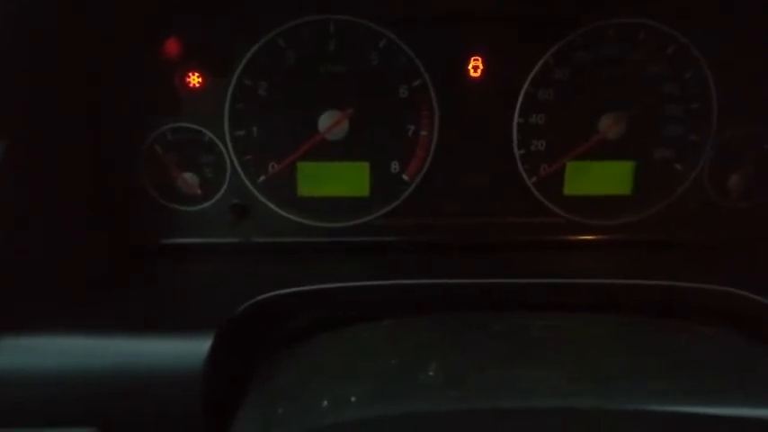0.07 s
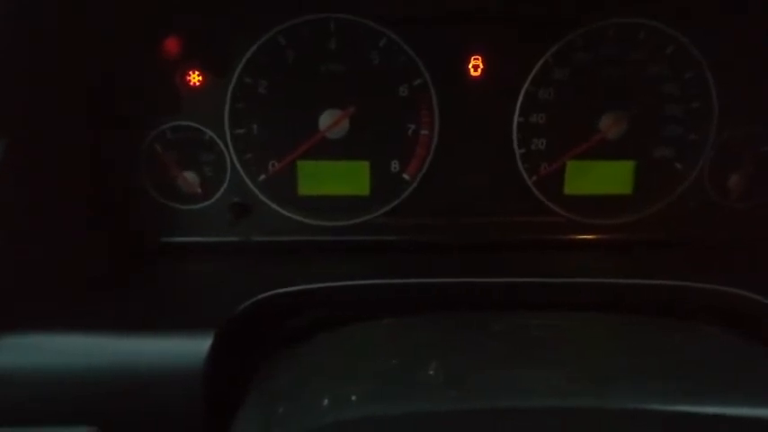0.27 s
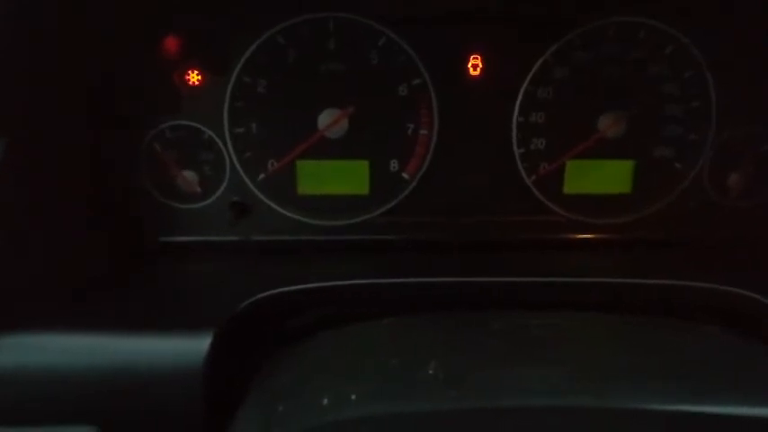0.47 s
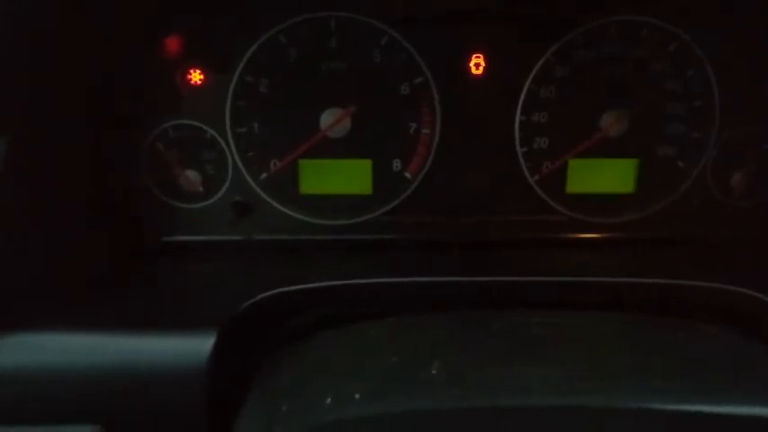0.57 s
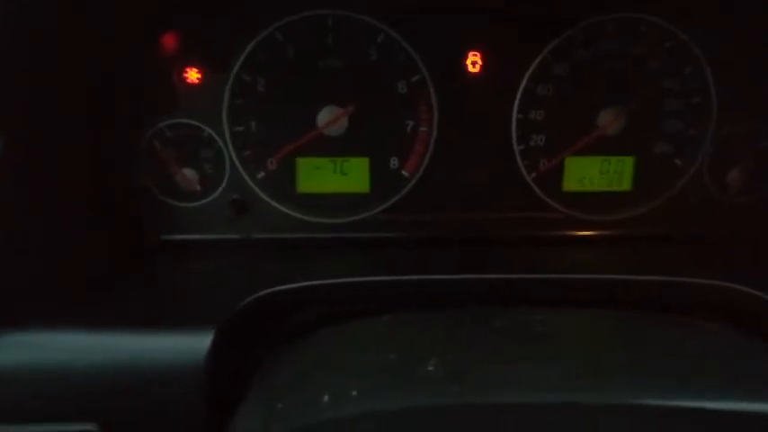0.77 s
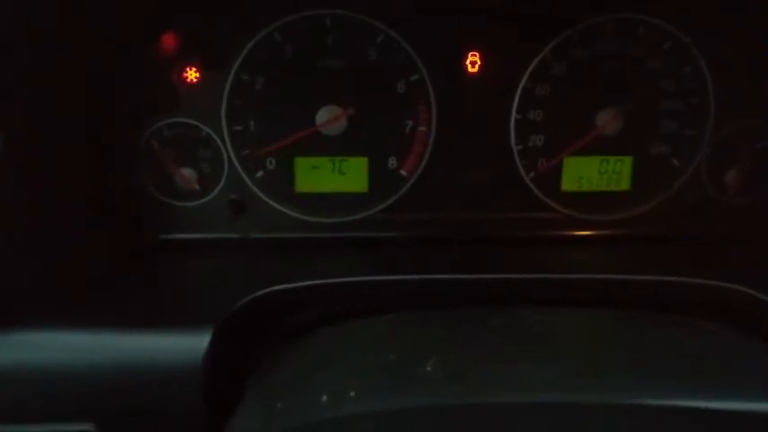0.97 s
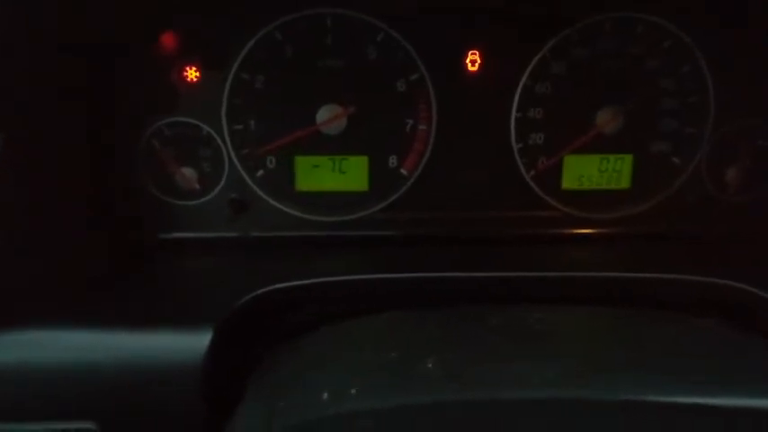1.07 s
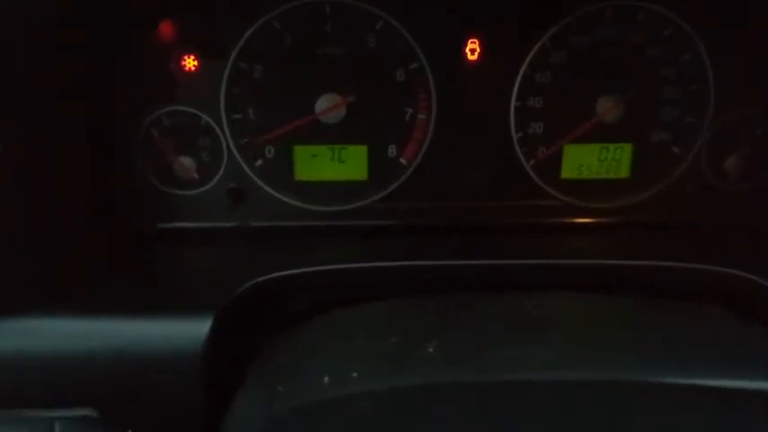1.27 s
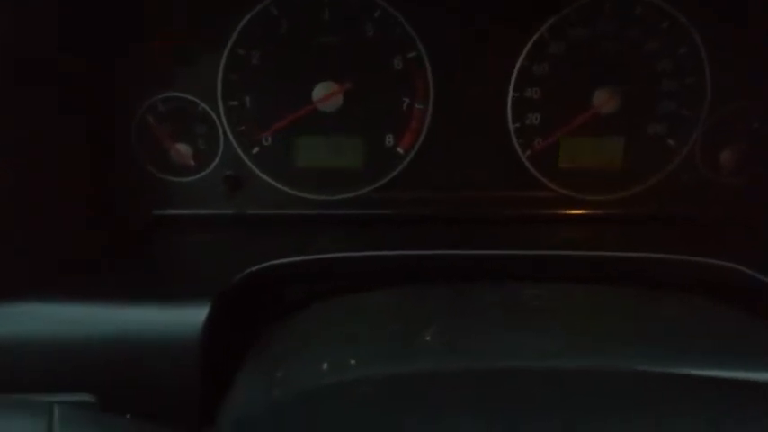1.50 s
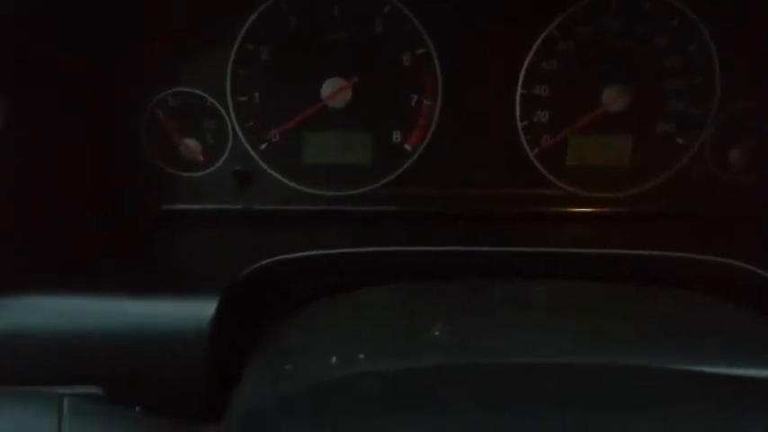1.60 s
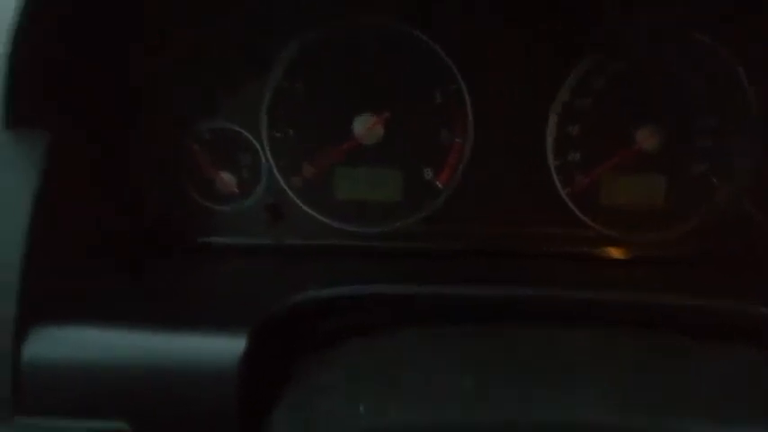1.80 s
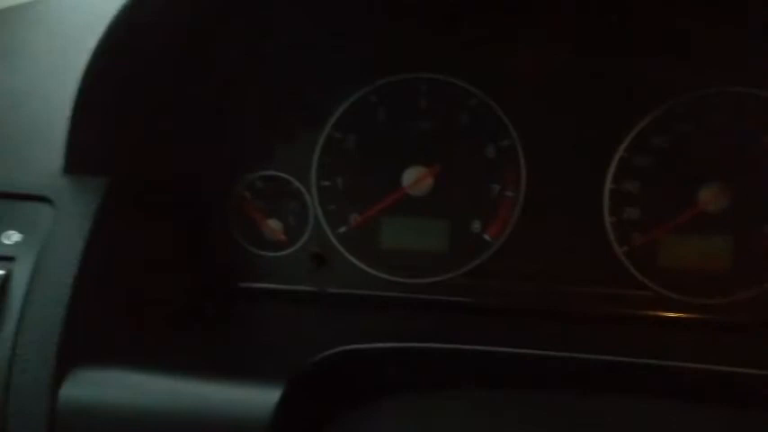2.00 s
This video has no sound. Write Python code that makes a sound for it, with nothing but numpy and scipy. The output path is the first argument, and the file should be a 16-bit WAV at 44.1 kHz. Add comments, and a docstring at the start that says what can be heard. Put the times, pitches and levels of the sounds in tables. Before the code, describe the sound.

Close, dry key clicks inside a quiet parked car: a bright double snap, low handling thumps, then a second cluster of snaps and trim ticks with rubbing fingers, fading to cloth rustle and faint low hum.

```python
"""Ignition key in a parked car

A hand turns the key: the lock snaps sharply, plastic trim knocks and ticks, and a sleeve rustles.
Snaps and knocks are bursts of tiny contacts with a brief cabin ring; small parts add decaying sines.
Cloth and rubbing fingers are shaped noise. Handling of the hand-held recorder adds low noise and
thumps. A low hum swells in the cabin, with a faint whine, a squeak and microphone hiss."""
import sys
import numpy as np
from scipy import signal
from scipy.fft import rfft, irfft, next_fast_len
from scipy.io import wavfile
from scipy.ndimage import uniform_filter1d, map_coordinates

SR = 44100
rng = np.random.default_rng(int(sys.argv[2]) if len(sys.argv) > 2 else 0)


def volts_from_decibels(level):
    """Turn decibel levels (scalar or array-like) into linear amplitude factors."""
    exponent = np.asarray(level, float) / 20
    return 10 ** exponent


def pcm_store(signal):
    """Save signal as 16-bit PCM."""
    levels = np.round(np.clip(np.atleast_2d(signal), -1, 1) * 32767)
    wavfile.write(sys.argv[1], SR, levels.astype(np.int16).T)


N = 90404  # samples, about 2.05 s
EARS = np.array([[.5], [-.5]])  # shares a left-right difference between the two ears
APART = [(1000, 0.009)]  # nearly unrelated ears: (frequency [Hz], left-right likeness [-1 to 1])


def unit(x):
    """Scale to rms 1."""
    return x / np.sqrt(np.mean(x ** 2) + 1e-20)


def along(points, hz):
    """Reads (frequency, value) points on a log frequency axis."""
    f, v = np.transpose(points)
    return np.interp(np.log(hz + 1), np.log(f + 1), v)


def curves(rows):
    """Draws one value per sample for each column after the time."""
    s, *columns = np.transpose(rows)
    return [np.interp(np.arange(N) / SR, s, column) for column in columns]


def wobble(rate):
    """A smooth random curve, rate knots a second."""
    knots = rng.standard_normal(int(N * rate / SR) + 4)
    return map_coordinates(knots, [np.arange(N) * rate / SR])


def filtered(x, response):
    """Multiplies the spectrum of x by a response of frequency."""
    m = next_fast_len(N + SR // 2)
    return irfft(rfft(x, m) * response(np.fft.rfftfreq(m, 1 / SR)), m)[..., :N]


def rush(spectrum, alike, patchy_db):
    """Stereo noise of rms 1, patchy in time and pitch, with a set likeness between the ears."""
    z = signal.stft(rng.standard_normal((2, N)), nperseg=512)[2]
    field = uniform_filter1d(rng.standard_normal(z.shape[1:]), 6, 0)
    field = uniform_filter1d(field, 10, 1)
    pair = signal.istft(z * volts_from_decibels(patchy_db * unit(field)), nperseg=512)[1][:, :N]

    def mid_side(hz):
        turn = np.arccos(np.clip(along(alike, hz), -1, 1)) / 2
        return volts_from_decibels(along(spectrum, hz)) * [np.cos(turn), np.sin(turn)]

    mid, side = filtered(pair, mid_side)
    return unit(np.array([mid + side, mid - side]))


def leaning(pair, balance):
    """Tilts a stereo pair left or right by frequency."""
    return filtered(pair, lambda hz: volts_from_decibels(along(balance, hz) * EARS))


def even(pair, size):
    """Flattens the slow chance swells of a low noise over size samples."""
    power = np.abs(uniform_filter1d(np.mean(pair ** 2, 0), size=size))
    return unit(pair / np.sqrt(power + 0.72))


def tone(rows, waver_hz, flutter_db, rate):
    """A slightly unsteady sine on a pitch and rms level curve."""
    hz, db = curves(rows)
    level = np.sqrt(2) * volts_from_decibels(db + flutter_db * wobble(rate))
    turns = np.cumsum(hz + waver_hz * wobble(rate)) / SR
    return level * np.sin(2 * np.pi * turns)


# colour of the background hiss: (frequency [Hz], relative level [dB])
HISS_COLOUR = [(120, -43), (200, -10.5), (333, -10.5), (446, -18.5), (690, -26), (769, -42), (2290, -25.5),
               (4660, -56), (15500, -40)]


def microphone_hiss():
    """Quiet patchy noise that lies under everything, nearly unrelated in the two ears."""
    return volts_from_decibels(-72.5) * rush(HISS_COLOUR, [(1000, 0.016)], patchy_db=4.0)


# low hum in the cabin: (time [s], average pitch [Hz], average level [dB])
HUM = [(0.9, 58.6, -87.5), (0.912, 58.9, -55), (0.944, 59.7, -35), (0.962, 58.7, -53.5),
       (1.062, 59.15, -44), (1.088, 57.75, -62.5), (1.222, 57.4, -43.5), (1.328, 61.3, -65.5),
       (1.36, 62.4, -39), (1.424, 64.1, -57), (1.512, 61.86, -39), (1.612, 65.27, -45),
       (1.682, 66.6, -37.5), (1.766, 66.8, -38.5), (1.846, 63.58, -51), (2.05, 66.8, -41.5)]


def cabin_hum():
    """A low sine that swells and sinks as its pitch drifts, the same in both ears."""
    fade_in = np.clip((np.arange(N) / SR - .8) / .1, 0, 1)
    return tone(HUM, waver_hz=0.48, flutter_db=0.41, rate=9.24) * fade_in


# faint thin tone: (time [s], average pitch [Hz], average level [dB])
WHINE = [(.55, 930, -101), (.75, 919, -78.5), (1.1, 924, -78), (1.14, 930, -92)]
# short high squeak: (time [s], average pitch [Hz], average level [dB])
SQUEAK = [(1.37, 3670, -90), (1.39, 3660, -68), (1.43, 3660, -54), (1.44, 3700, -88)]


def whine_and_squeak():
    """Two unsteady sines, both slightly stronger on the left."""
    whine = tone(WHINE, waver_hz=2.6, flutter_db=1.5, rate=21.7) * volts_from_decibels(3 * EARS)
    squeak = tone(SQUEAK, waver_hz=88, flutter_db=2.5, rate=180) * volts_from_decibels(.2 * EARS)
    return whine + squeak


# handling rumble: (time [s], deep level [dB], upper level [dB], level of the flutter above it [dB])
HANDLING = [(0.0, -45.5, -49.5, -62.5), (0.08, -44, -54.5, -47), (0.12, -56, -45.5, -59),
            (0.15, -35, -50, -59.5), (0.25, -43, -49, -48), (0.32, -41.5, -50, -54.5),
            (0.36, -49, -59, -49), (0.44, -37.5, -46, -60.5), (0.61, -37, -45, -56), (0.68, -31, -43, -51),
            (0.73, -41.5, -40.5, -51), (0.8, -33.5, -43.5, -61), (0.87, -39, -49, -78),
            (0.95, -46, -52, -65.5), (1.06, -47, -55, -84), (1.1, -50.5, -66, -84),
            (1.24, -47.5, -54, -56.5), (1.28, -46, -48.5, -52.5), (1.41, -51.5, -59, -97),
            (1.45, -52.5, -57, -64.5), (1.75, -53.5, -61, -68), (1.8, -66, -60, -61.5),
            (2.0, -57, -63.5, -73.5), (2.05, -64, -73, -77)]
# colours of its deep, upper and flutter bands: (frequency [Hz], relative level [dB])
DEEP = [(5.9, -55), (10, -4.5), (25, 3), (43, -6.5), (90, -12.5), (120, -30), (200, -120)]
UPPER = [(35, -12), (60, 4), (75, -4), (135, 1.5), (220, -18.5), (290, -48), (480, -120)]
FLUTTER = [(100, -33), (170, 0.5), (314, -12.5), (383, -29.5), (500, -25.5), (650, -67), (1100, -120)]
# how alike the ears are in the upper and flutter bands: (frequency [Hz], likeness [-1 to 1])
UPPER_ALIKE = [(80, 0.97), (150, 0.97), (300, 0.68), (500, 0.082)]


def handling_rumble():
    """Lumpy low noise in three bands, nearly the same in both ears at the bottom."""
    deep_db, upper_db, flutter_db = curves(HANDLING)
    out = volts_from_decibels(deep_db) * even(rush(DEEP, [(40, .999)], patchy_db=3.0), size=2600)
    upper_level = volts_from_decibels(upper_db + 3.4 * wobble(26.04))
    out += upper_level * even(rush(UPPER, UPPER_ALIKE, patchy_db=-1.0), size=1500)
    flutter_level = volts_from_decibels(flutter_db + 0.76 * wobble(26.0))
    out += flutter_level * even(rush(FLUTTER, UPPER_ALIKE, patchy_db=-0.9), size=1200)
    return out


# soft thumps of the hand on the housing:
# (time [s], level before the soft start [dB], pitch [Hz], time to fall 60 dB [s])
THUMPS = [(.185, -35, 53, 0.05), (0.629, -27, 81, 0.064), (0.657, -24.5, 13.12, 0.85),
          (0.672, -15, 63, 0.047), (0.718, -27.5, 146, 0.068), (0.756, -35, 81, 0.045),
          (.8, -28, 105, 0.032), (1.245, -38, 260, 0.037), (1.26, -34.5, 169, 0.09),
          (1.265, -34.5, 311, 0.047), (1.804, -44.5, 252, 0.081)]


def hand_thumps():
    """Low sines that start softly and die away, the same in both ears."""
    out = np.zeros(N)
    for s, db, pitch_hz, t60 in THUMPS:
        since = np.maximum(np.arange(N) / SR - s, 0)
        soft_start = 1 - np.exp(-since / 0.0043)
        out += volts_from_decibels(db - 60 * since / t60) * soft_start * np.sin(2 * np.pi * pitch_hz * since)
    return out


# sleeve rustle: (time [s], treble level before a 4 dB lift and its balance [dB],
# middle level before its balance [dB])
RUSTLE = [(0, -93, -56.5), (.1, -101, -56.5), (.135, -98, -70), (.17, -109, -58.5), (.4, -97, -57),
          (.46, -80, -62), (.56, -64.5, -59), (.65, -66, -63), (.8, -68, -69), (.97, -74.5, -70.5),
          (1.03, -75.5, -71.5), (1.05, -58, -61), (1.1, -66.5, -68.5), (1.16, -59.5, -47), (1.19, -68, -66),
          (1.3, -58.5, -57.5), (1.62, -70.5, -79), (1.68, -73, -74), (1.76, -66.5, -72), (1.9, -67.5, -78),
          (2.05, -67, -72.5)]
# colours of the two bands: (frequency [Hz], relative level [dB])
TREBLE = [(2060, -50), (3500, -41), (4520, -25), (5050, -4.5), (5510, 2), (6900, -8), (8530, -2),
          (11100, -6), (13300, -5.5), (15500, -7.5)]
MIDDLE = [(210, -46.5), (350, -6.5), (543, -10.5), (767, -3), (885, -0.5), (950, -7.5), (1080, -0.5),
          (1220, -3), (1340, -13.5), (1660, -7.5), (1920, -30), (2400, -12.5), (4000, -20.5), (5260, -45),
          (6000, -38), (7800, -78), (13200, -120)]
# how far each band leans left: (frequency [Hz], left-right difference [dB])
TREBLE_BALANCE = [(60, 0.0), (110, 0.0), (200, 2), (380, 6), (700, 8), (1290, 12), (2380, 8), (4400, 17.5),
                  (8120, -12.5), (15000, -11)]
MIDDLE_BALANCE = [(60, -6), (110, 6), (200, 6), (380, -1.5), (700, 2), (1290, 5), (2380, 6.5), (4400, 0),
                  (8120, -8), (15000, 1.0)]
# how alike the ears are in the middle: (frequency [Hz], likeness [-1 to 1])
MIDDLE_ALIKE = [(350, 0.19), (650, -0.56), (1400, 0.11), (3000, -0.21)]


def cloth_rustle():
    """Smooth cloth hiss: treble and middle noise bands, each on its own level curve."""
    treble_db, middle_db = curves(RUSTLE)
    treble = volts_from_decibels(treble_db + 4.0) * leaning(rush(TREBLE, APART, patchy_db=3.0), TREBLE_BALANCE)
    middle_level = volts_from_decibels(middle_db + 0.35 * wobble(24))
    middle = leaning(rush(MIDDLE, MIDDLE_ALIKE, patchy_db=2.5), MIDDLE_BALANCE)
    return treble + middle_level * middle


# a sleeve slides: (time [s], level of its swish [dB], level of its hiss [dB])
SHUFFLE = [(1.66, -84, -70.5), (1.75, -67.5, -65.5), (1.88, -66, -60.5), (1.95, -79, -64.5),
           (2.05, -78, -64.5)]
# colours of swish and hiss: (frequency [Hz], relative level [dB])
SLEEVE = [(530, -42), (900, -14), (1320, -2), (1410, 1), (1750, 2.5), (2800, -14), (3640, -45),
          (6160, -120)]
SLEEVE_HISS = [(1180, -44), (2000, 1), (2350, -19), (3020, -1), (4110, 0.5), (8000, -0.5), (10400, -39),
               (17600, -120)]


def sliding_sleeve():
    """Two patchy noise bands that swell and fade as the sleeve slides."""
    swish_db, hiss_db = curves(SHUFFLE)
    swish = volts_from_decibels(swish_db) * rush(SLEEVE, APART, patchy_db=-5.0)
    return swish + volts_from_decibels(hiss_db) * rush(SLEEVE_HISS, APART, patchy_db=4.5)


# fingers rubbing as the key turns back: (time [s], hiss level before a 1 dB lift and the balance [dB],
# low scrape level before a 3 dB lift and the balance [dB])
RUB = [(1.2, -73, -101), (1.24, -55.5, -56), (1.28, -53, -63), (1.34, -52, -78), (1.37, -50.5, -73),
       (1.42, -52.5, -95), (1.46, -48, -54), (1.49, -47.5, -52.5), (1.53, -50, -51.5), (1.57, -53.5, -58.5),
       (1.59, -56, -70), (1.62, -83, -83.5)]
# colours of hiss and scrape: (frequency [Hz], relative level [dB])
RUB_HISS = [(1060, -37), (1800, -3), (2060, 1.5), (2320, -16), (2560, -6), (3290, 1), (3770, -2.5),
            (4850, -0.5), (15500, -6)]
RUB_SCRAPE = [(180, -59), (300, -25), (553, -2), (735, -5.5), (847, -12.5), (1000, -16), (1330, -7.5),
              (1820, -16), (2500, -13.5), (3250, -31), (5500, -120)]
# how far the rub leans left: (frequency [Hz], left-right difference [dB])
RUB_BALANCE = [(60, 2), (110, 7), (200, 2), (380, -3), (700, 8.5), (1290, 3), (2380, 0.5), (4400, 6.5),
               (8120, -5), (15000, -4)]


def finger_rub():
    """A noise hiss and a low scrape, both with quickly wavering levels."""
    hiss_db, scrape_db = curves(RUB)
    hiss = volts_from_decibels(hiss_db + 1 + 0.23 * wobble(41.3)) * rush(RUB_HISS, APART, patchy_db=1.2)
    scrape = volts_from_decibels(scrape_db + 3 + 1.8 * wobble(90)) * rush(RUB_SCRAPE, APART, patchy_db=-0.7)
    return leaning(hiss + scrape, RUB_BALANCE)


# short pitched rings of small parts, alone or under a hit: (time [s], level before a small random
# change and the soft start [dB], pitch [Hz], time to fall 60 dB [s], left-right difference [dB])
RINGS = [(.283, -49.5, 866, 0.07, 12), (0.499, -44, 1200, 0.026, -4), (0.5518, -24.5, 1253, 0.023, 0),
         (.553, -21, 2660, 0.018, -9), (.5525, -19.5, 5590, 0.022, 5), (.637, -51, 1663, 0.036, 7.5),
         (.713, -49.5, 1670, 0.036, 11), (.754, -56, 1320, 0.023, 1), (.797, -56, 1650, 0.039, 5),
         (.898, -51, 1230, 0.024, 2), (1.138, -34.5, 1240, 0.023, 18), (1.15, -38, 880, 0.087, 8),
         (1.168, -42, 870, 0.043, 3), (1.2596, -17.5, 5350, 0.011, 6), (1.258, -29.5, 2190, 0.026, 11),
         (1.278, -24, 1332, 0.028, 4.5), (1.464, -35.5, 864, 0.063, 6), (1.557, -42.5, 1655, 0.035, 10),
         (1.48, -38, 687, 0.025, -6), (1.514, -46, 594, .04, 9), (1.358, -40, 640, 0.033, 1)]
# dry ticks, only a few cycles long: same columns and units as the rings
DRY_TICKS = [(1.8667, -32.5, 4500, 0.0022, 13), (1.886, -37, 3440, 0.0034, 16),
             (1.886, -39.5, 1400, 0.0053, 12)]


def small_part_rings():
    """Decaying sines with a drifting phase that is one radian apart between the ears."""
    out, t = np.zeros((2, N + SR)), np.arange(4096) / SR
    for s, db, pitch_hz, t60, pan in RINGS + DRY_TICKS:
        level = volts_from_decibels(db + EARS * pan - 60 * t / t60 + rng.normal(0, 1))
        soft_start = 1 - np.exp(-t * pitch_hz / np.clip(40 * t60, .5, 1.3))
        drift = .06 * np.cumsum(rng.standard_normal(len(t)))  # radians
        ring = level * soft_start * np.sin(2 * np.pi * pitch_hz * t + EARS + drift)
        out[:, round(s * SR):][:, :4096] += ring
    return out[:, :N]


# how long the small cabin rings: (frequency [Hz], time to fall 60 dB [s])
CABIN = [(300, 0.065), (1200, 0.073), (4000, 0.054), (12000, 0.039)]


def cabin_tail():
    """A direct click for each ear, the right one later, plus noise that fades at its own pace by pitch."""
    tail_db, right_lag_s = 1.5, .0003  # tail energy relative to the direct click
    hz, frame, z = signal.stft(rng.standard_normal((2, 8192)), SR, nperseg=128)
    fade = volts_from_decibels(-60 * frame / along(CABIN, hz)[:, None])
    tail = signal.istft(z * fade, SR, nperseg=128)[1][:, :8192]
    tail = volts_from_decibels(tail_db) * tail / np.linalg.norm(tail[0])
    tail[0, 0] += 1
    tail[1, round(right_lag_s * SR)] += 1
    return tail


def hit(rattle_s, colour_db):
    """A dense rattle of tiny contacts rung by the cabin, then coloured for each ear."""
    contacts_per_s, uneven_db, rise_share = 5000, 4, 0.2
    t = np.arange(8192) / SR
    rise = 1 - np.exp(-(t + 1e-4) / (rise_share * rattle_s))
    shape = rise * np.exp(-(t / max(rattle_s, 3e-4)) ** 1.9)
    contacts = rng.standard_normal(8192) * (rng.random(8192) < contacts_per_s / SR)
    contacts *= shape * volts_from_decibels(uneven_db * rng.standard_normal(8192))
    raw = rfft(contacts, 16384) * rfft(cabin_tail(), 16384)
    # level the broad spectrum first, so that the colour sets it
    white = np.abs(uniform_filter1d(np.abs(raw) ** 2, size=200, axis=1)) ** -.5
    # folding the cepstrum gives a filter that never sounds ahead of the hit
    cepstrum = irfft(np.log(white * volts_from_decibels(np.clip(colour_db, -80, 80))), 16384)
    cepstrum[:, 1:8192] *= 2
    cepstrum[:, 8193:] = 0
    out = irfft(raw * np.exp(rfft(cepstrum)), 16384)[:, :8192]
    return out / np.sqrt(np.mean(out[:, :384] ** 2)) / 3  # the opening 384 samples get rms 1/3


def hit_axes():
    """The frequencies of a hit's spectrum, and a tilt axis in octaves around 4 kHz."""
    hz = np.fft.rfftfreq(16384, 1 / SR)
    return hz, np.log2((hz + 200) / 4000)


# dull knocks of key and trim: (time [s], nominal peak level [dB], rattle length [s],
# tilt [dB per octave], left-right difference [dB])
KNOCKS = [(0.28, -46, 0.011, -5, 3), (.542, -39, 0.011, -1.5, 4), (1.045, -46, 0.0083, -3.5, 5),
          (1.136, -29, 0.008, -1, 6), (1.167, -42, 0.011, -5.5, 1), (1.241, -36.5, 0.028, -0.5, -0.5),
          (1.276, -22, 0.0053, 2, 1), (1.319, -38, 0.0032, -6.5, 3.5), (1.358, -32, 0.0042, 2.3, 2),
          (1.52, -37, 0.0051, -1, 0), (1.557, -34.5, 0.0019, 0.6, 5)]
# colour of the plastic trim: (frequency [Hz], relative level [dB])
TRIM = [(120, -31.5), (200, -6), (315, -15), (430, -13), (812, -5), (1110, -8.5), (1350, -0.5), (1880, -13),
        (2210, -4.5), (3240, -11), (3890, -7.5), (4180, -13), (4840, -6.5), (6470, -16.5), (15500, -39)]


def trim_knocks():
    """Rattles of contacts, coloured like trim and tilted darker or brighter."""
    out = np.zeros((2, N + SR))
    hz, octave = hit_axes()
    for s, db, rattle_s, tilt, pan in KNOCKS:
        colour = along(TRIM, hz) + tilt * octave + EARS * pan
        out[:, round(s * SR):][:, :8192] += volts_from_decibels(db) * hit(rattle_s, colour)
    return out[:, :N]


# bright snaps of the lock: (time [s], nominal peak level [dB], rattle length [s],
# tilt [dB per octave], extra left-right difference [dB], its tilt [dB per octave])
SNAPS = [(0.4976, -22.5, 0.0076, -3.5, 0, 1.5), (0.506, -13.5, 0.0055, -0.8, -0.5, 2),
         (0.5506, -9, 0.0035, -1.5, 2.1, 2.5), (1.2565, -12, 0.0031, 0, 2.5, 1.5),
         (1.4354, -23, 0.0059, -1.5, -2, 6), (1.462, -13, 0.0024, 0.5, 1, 2.5)]
# colour of the lock: (frequency [Hz], relative level [dB])
LOCK = [(410, -39), (700, -22.5), (1220, -12), (1800, -15), (2590, -8.5), (3070, -10.5), (3870, -7),
        (4520, -6), (5360, -1), (6260, -3.5), (7030, -5), (8540, -5.5), (9470, -8), (13400, -9.5),
        (15500, -7.5)]
# how far the lock leans left: (frequency [Hz], left-right difference [dB])
LOCK_BALANCE = [(60, 24), (110, -11), (200, 3), (380, 15), (700, 5.5), (1290, 16), (2380, -0.5), (4400, 3),
                (8120, -13.5), (15000, -14.5)]


def lock_snaps():
    """Brief rattles of contacts with the bright colour of the lock."""
    out = np.zeros((2, N + SR))
    hz, octave = hit_axes()
    for s, db, rattle_s, tilt, pan, lean in SNAPS:
        balance = along(LOCK_BALANCE, hz) + pan + lean * octave
        colour = along(LOCK, hz) + tilt * octave + EARS * balance
        out[:, round(s * SR):][:, :8192] += volts_from_decibels(db) * hit(rattle_s, colour)
    return out[:, :N]


def scene():
    """Adds all sources, from the lock to the background."""
    clicks = lock_snaps() + trim_knocks() + small_part_rings()
    rustle = cloth_rustle() + finger_rub() + sliding_sleeve()
    handling = handling_rumble() + hand_thumps()
    background = cabin_hum() + whine_and_squeak() + microphone_hiss()
    return clicks + rustle + handling + background


def band_limit(x):
    """A steep low-pass at the top of the band."""
    return signal.sosfilt(signal.butter(12, 16680, fs=SR, output="sos"), x)


def record(dry):
    """Rolls off the extreme treble steeply around a top frequency."""
    top_hz, width_hz = 15800, 70
    mix = filtered(dry, lambda hz: 1 / (1 + np.exp(np.clip((hz - top_hz) / width_hz, -50, 50))))
    return band_limit(mix)


dry = scene()
out = record(dry)
pcm_store(out)
```